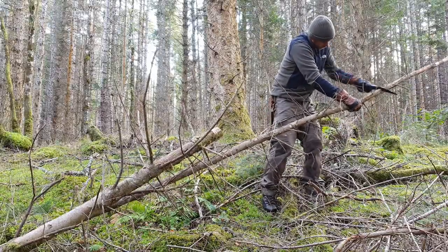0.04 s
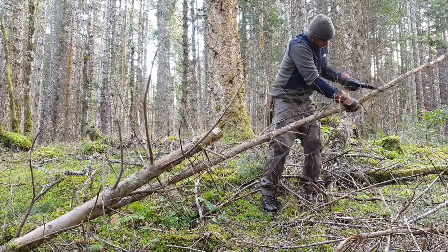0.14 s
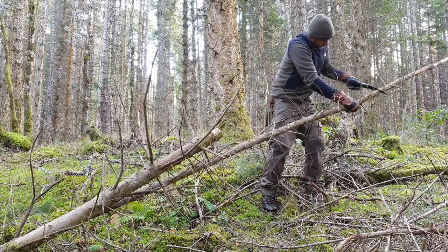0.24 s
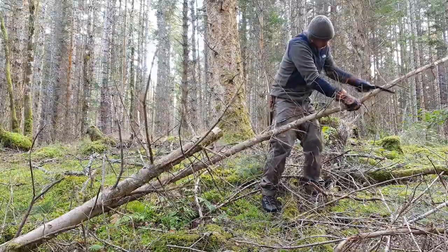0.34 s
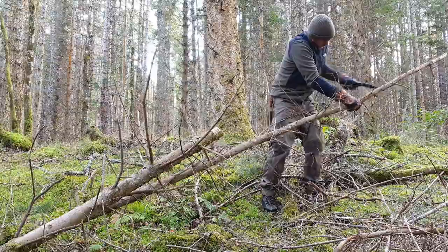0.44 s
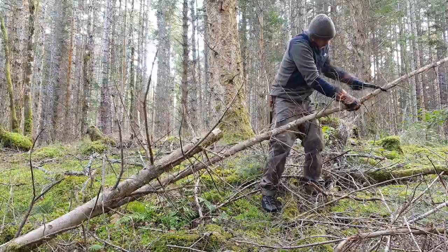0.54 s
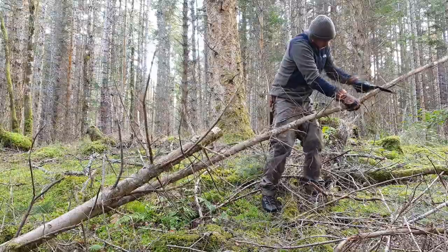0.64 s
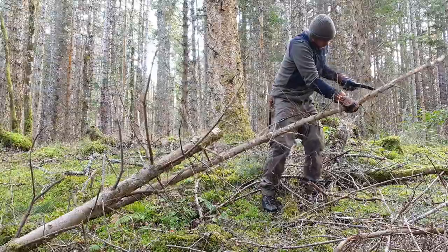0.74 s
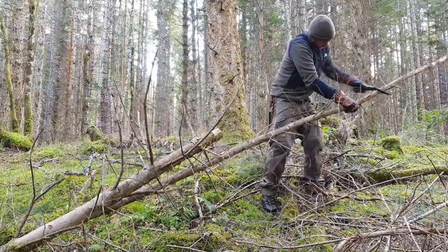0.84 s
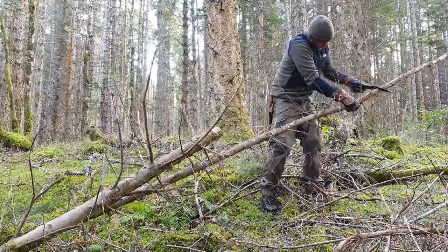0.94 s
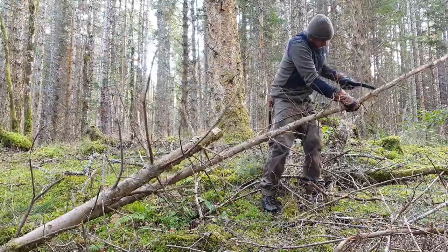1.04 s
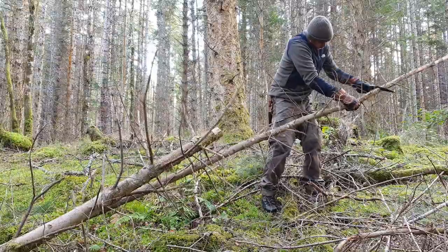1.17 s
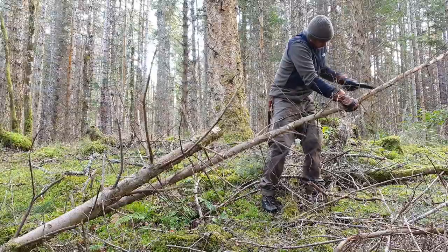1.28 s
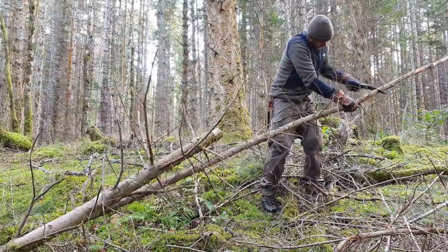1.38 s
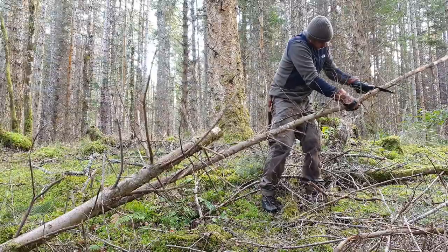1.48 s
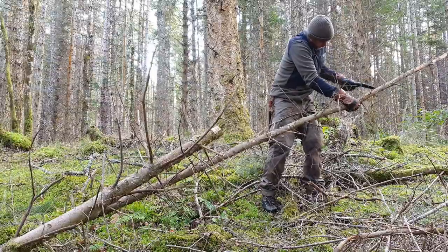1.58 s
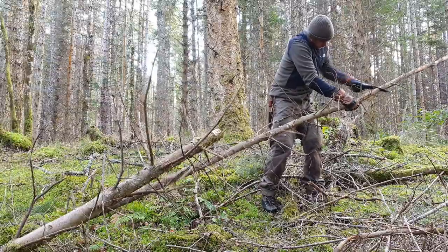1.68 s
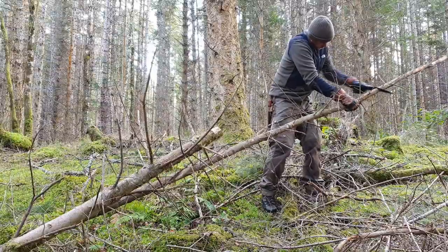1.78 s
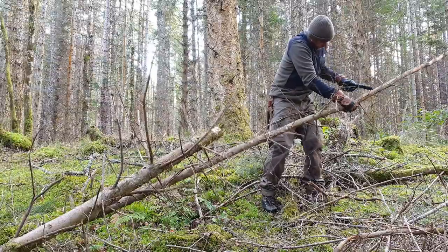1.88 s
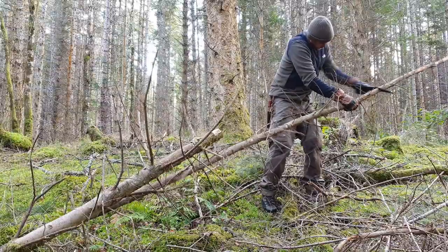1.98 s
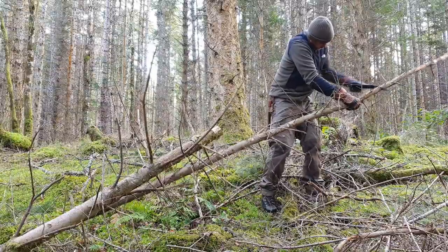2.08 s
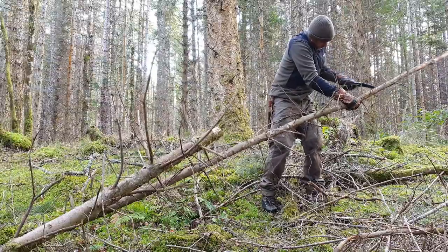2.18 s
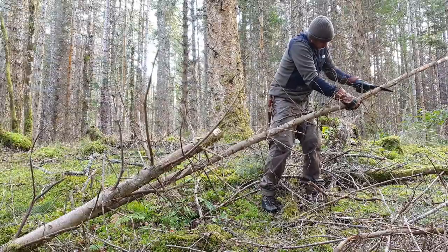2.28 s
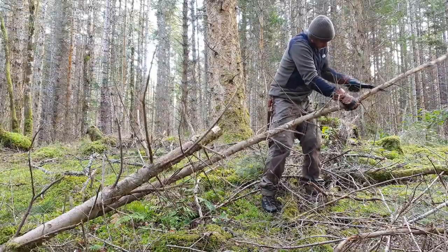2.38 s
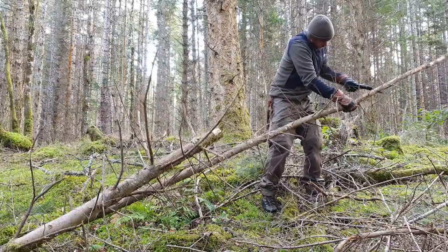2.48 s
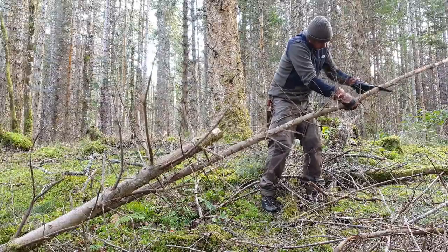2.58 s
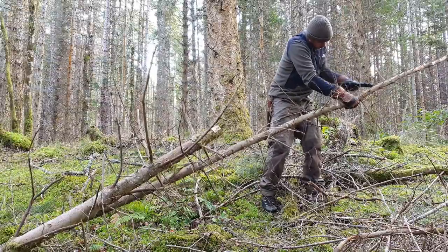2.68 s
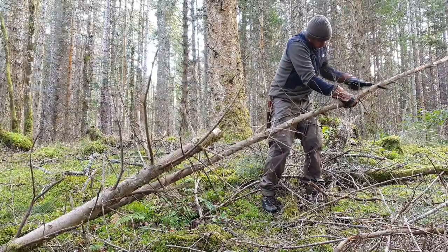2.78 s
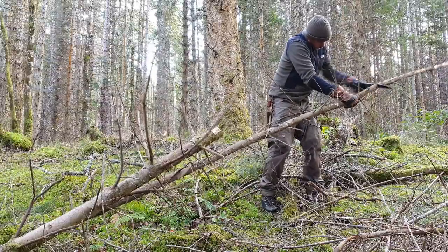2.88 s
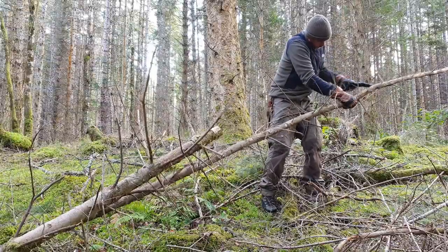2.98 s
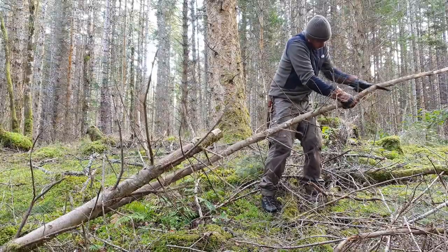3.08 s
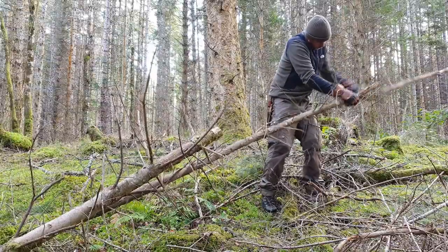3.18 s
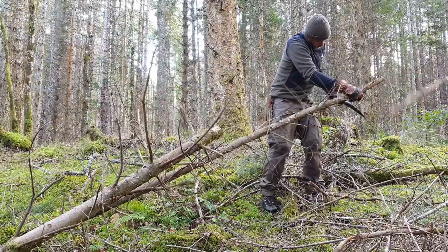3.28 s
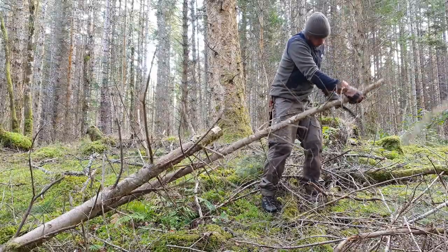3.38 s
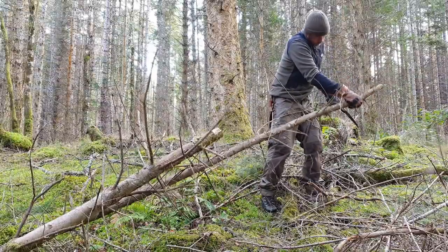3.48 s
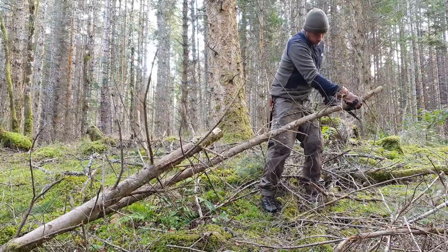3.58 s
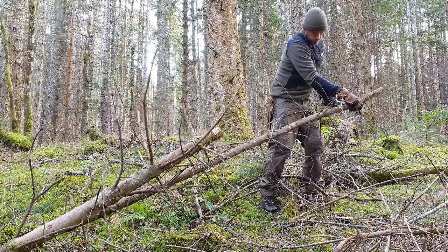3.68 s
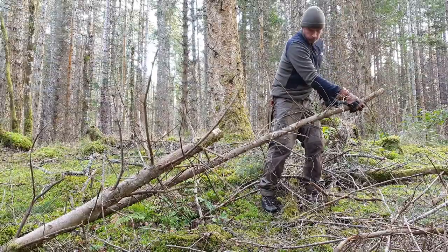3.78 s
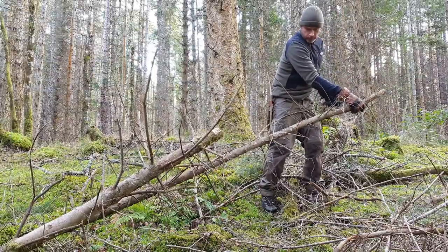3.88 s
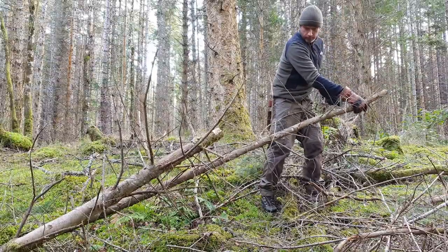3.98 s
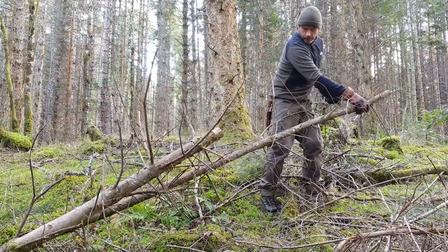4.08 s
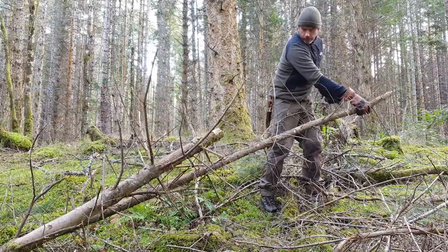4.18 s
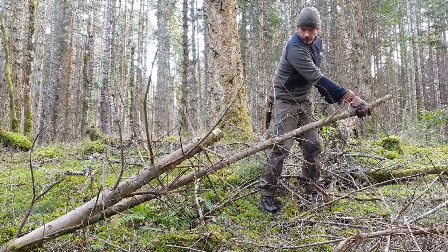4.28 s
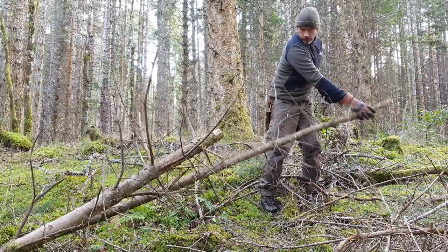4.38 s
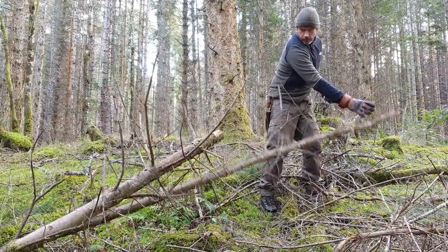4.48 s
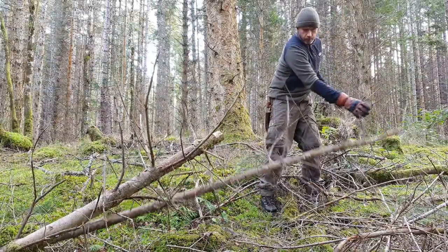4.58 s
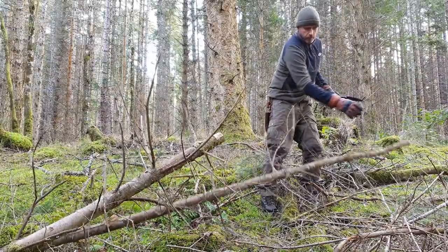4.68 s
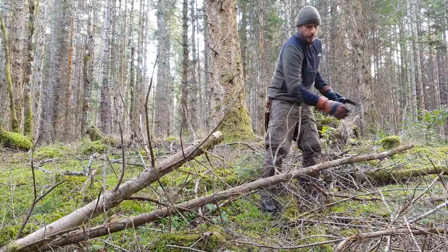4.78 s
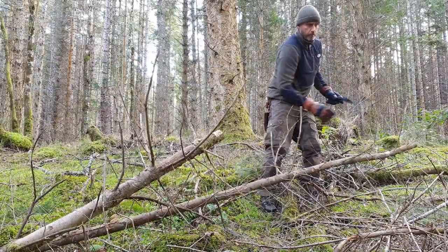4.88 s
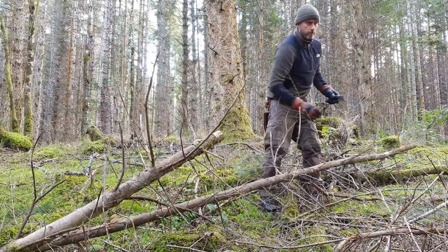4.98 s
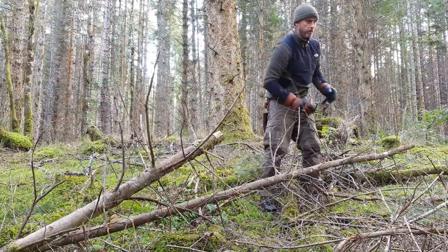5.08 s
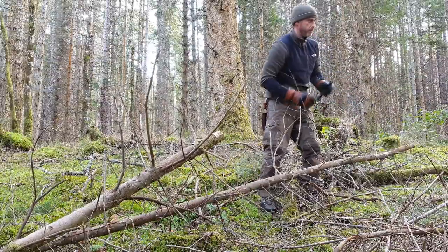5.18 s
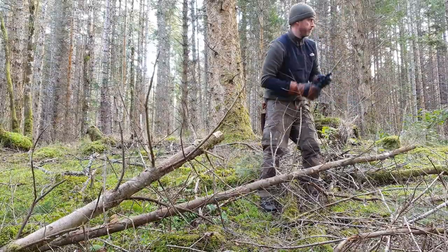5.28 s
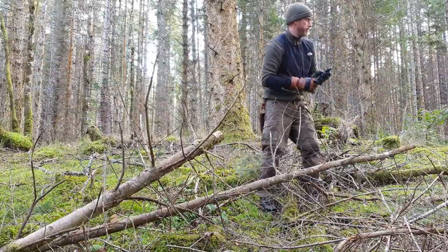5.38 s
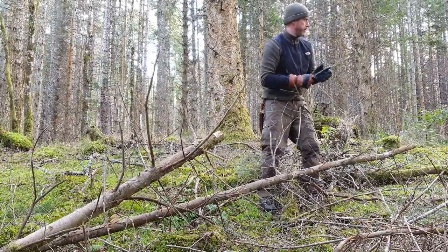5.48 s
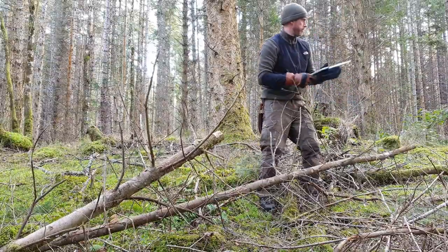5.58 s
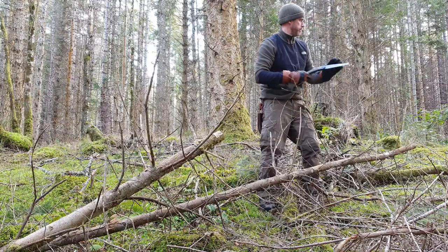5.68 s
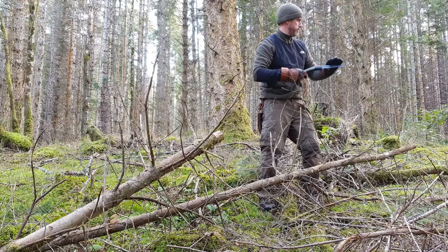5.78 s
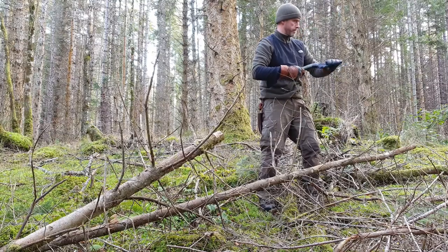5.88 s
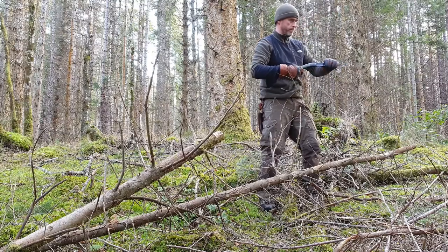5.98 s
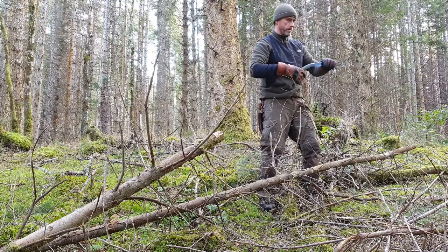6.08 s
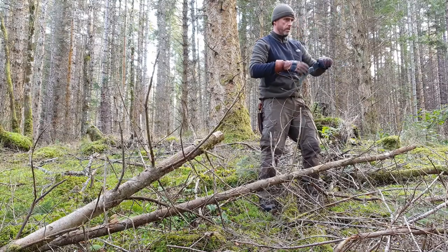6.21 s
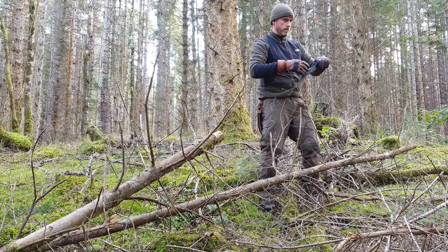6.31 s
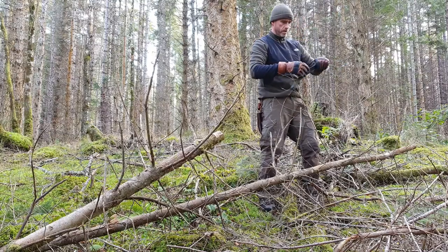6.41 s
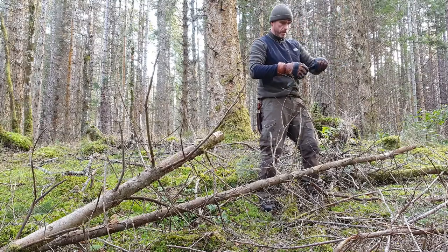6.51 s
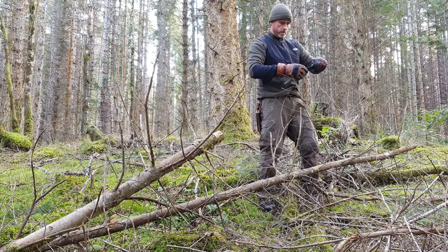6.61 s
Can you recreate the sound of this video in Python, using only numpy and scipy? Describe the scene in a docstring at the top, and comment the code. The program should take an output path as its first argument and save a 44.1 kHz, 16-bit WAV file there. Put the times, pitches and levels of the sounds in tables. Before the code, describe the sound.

Quick hand sawing, about seven strokes a second, coarse and woody with fizzing teeth, slightly left of centre in stereo. It stops just after three seconds following a loud dry snap. Small clicks and scraping twigs follow, then the remaining branch falls into brush with brittle cracks and muffled thumps. Afterwards only tiny rustles, faint treetop air and soft low wind bumps on the right, with a short woodland echo.

```python
"""In a conifer forest, a hand saw is pushed and pulled through a dead branch a few metres away.
Striking teeth and torn fibres make the rasp; a caught blade judders; breaks are short bursts ringing the wood.
Twigs scrape as clumps of grains, and the rest of the branch drops into dry brush with cracks and dull thuds.
Scattered noise taps give a short echo off brush and trunks; shaped noise gives faint treetop wind,
and low buffets almost all on the right."""
import sys
import numpy as np
from scipy import signal
from scipy.fft import rfft, irfft
from scipy.io import wavfile

SR = 44100
rng = np.random.default_rng(int(sys.argv[2]) if len(sys.argv) > 2 else 0)


def materialize(psi):
    """Save the field psi as 16-bit PCM at rate SR to the path in sys.argv[1].

    A 1-D psi becomes a single channel; in a 2-D psi each row is a channel.
    """
    bounded = np.clip(np.atleast_2d(psi).T, -1, 1)
    quanta = np.round(bounded * 32767).astype(np.int16)
    wavfile.write(sys.argv[1], SR, quanta)


N = 293253
TIME = np.arange(N) / SR


def amp(db):
    """Decibels to gain."""
    return 10 ** (np.asarray(db) / 20)


def unit(x):
    """Scales to an rms of 1."""
    return x / np.sqrt(np.mean(x ** 2) + 1e-20)


def read(points, hz):
    """Reads a table on a log-frequency axis."""
    f, value = np.transpose(points)
    return np.interp(np.log(hz + 1), np.log(f + 1), value)


def colour(x, points):
    """Minimum-phase filter with the given spectrum, so nothing sounds ahead of its cause."""
    level_db = read(points, abs(np.fft.fftfreq(4096, 1 / SR)))
    log_gain = np.log(amp(np.maximum(level_db, -90)))
    spectrum = np.exp(np.conj(signal.hilbert(log_gain)))
    taps = np.fft.ifft(spectrum).real[:2048]
    return signal.oaconvolve(x, taps)[:len(x)]


def ring(x, hz, width_hz):
    """One resonance, of gain 1 at its peak."""
    return signal.lfilter(*signal.iirpeak(hz, hz / width_hz, SR), x)


def wander(hz):
    """Smooth random motion of rms 1, mostly slower than the given rate."""
    slow = np.exp(-(np.fft.rfftfreq(N, 1 / SR) / hz) ** 2)
    return unit(irfft(rfft(rng.standard_normal(N)) * slow, N))


def grains(per_s, spread_db):
    """Random clicks of either sign, most of them small."""
    size = amp(spread_db * np.minimum(rng.exponential(1, N), 4.5))
    size = size * rng.choice([-1, 1], N)
    return unit(size * (rng.random(N) < per_s / SR))


def add(mix, start_s, sound):
    """Mixes a sound in at a time."""
    part = mix[..., max(round(start_s * SR), 0):][..., :sound.shape[-1]]
    part += sound[..., :part.shape[-1]]


def ports(x, left_over_right_db, left_lag=7):
    """Two microphones a little apart: a positive lag (samples) brings the sound to the left one later."""
    left = np.roll(x, round(left_lag)) * amp(left_over_right_db / 2)
    right = x * amp(-left_over_right_db / 2)
    return np.array([left, right])


# spectrum of the far wind: pitch_hz, relative_level_db
WIND_SPECTRUM = [(20, -11.5), (45, -2.5), (65, 5.5), (95, -7), (128, -4.5), (200, -12), (330, -10),
                 (450, -9), (750, -9.5), (1200, -15), (2000, -27), (4000, -41), (8000, -47.5),
                 (16000, -47.5)]
# likeness of the two channels in the wind: pitch_hz, likeness (0-1, no unit)
WIND_LIKENESS = [(40, 1), (130, 0.2), (290, 0.8), (640, 0.4), (1400, 0)]


def air(wind_db=-58, sway_db=1, hum_db=-55):
    """Far wind in the treetops as shaped noise; the long branch hums low while it is being sawn."""
    a, b = rfft(rng.standard_normal((2, N)))
    same = np.clip(read(WIND_LIKENESS, np.fft.rfftfreq(N, 1 / SR)), 0, 1)
    pair = irfft(np.array([a, same * a + np.sqrt(1 - same ** 2) * b]), N)
    wind = unit(np.array([colour(channel, WIND_SPECTRUM) for channel in pair]))
    wind = amp(wind_db + sway_db * wander(2)) * wind
    hum = unit(ring(ring(rng.standard_normal(N), 61, 33), 61, 33))
    hum = hum * np.interp(TIME, [2.2, 3.4], [1, 0])  # fades out as the sawing ends
    return wind + amp(hum_db) * hum


# strokes of the arm, pushing first, then pulling and pushing by turns: start_s, effort_db
STROKES = [(-0.03, -41), (0.104, -40.5), (0.257, -44.5), (0.382, -38), (0.53, -40), (0.676, -38.5),
           (0.812, -41), (0.947, -37), (1.093, -40), (1.242, -39), (1.372, -39), (1.504, -37.5),
           (1.652, -38), (1.79, -39), (1.932, -40.5), (2.064, -36.5), (2.215, -41.5), (2.366, -43.5),
           (2.497, -43), (2.612, -36), (2.763, -41.5), (2.886, -38), (3.038, -43)]
SAWING_ENDS_S = 3.18


def arm(bite_power=0.84, slide_db=-16, hiss_db=-48.77, hiss_follows=0.85, usual_effort_db=-38.5,
        hiss_sag_db=-1.5):
    """Each stroke waits at the turn, speeds up and stops; the rasp follows blade speed and effort."""
    start_s, effort_db = np.transpose(STROKES)
    length_s = np.diff(start_s, append=SAWING_ENDS_S)
    k = np.clip(np.searchsorted(start_s, TIME) - 1, 0, len(start_s) - 1)
    pull = k % 2
    # for (push, pull): still shares of the stroke before and after the move
    wait, rest = np.array([.06, .075])[pull], np.array([.08, .07])[pull]
    # a negative lean makes the bite harder early in the stroke
    lean = np.array([-0.84, -0.36])[pull]
    travel = np.clip(((TIME - start_s[k]) / length_s[k] - wait) / (1 - wait - rest), 0, 1)
    speed = abs(np.sin(np.pi * travel))
    rasp = amp(effort_db[k]) * np.exp(lean * (travel - .5)) * speed ** bite_power
    # the blade still rubs in the cut as it turns round
    slide = amp(slide_db) * (TIME < SAWING_ENDS_S)
    # the hiss follows the effort only in part
    hiss = amp(hiss_db + hiss_follows * (effort_db[k] - usual_effort_db)) * np.hypot(speed, slide)
    hiss = hiss * amp(hiss_sag_db * (travel - .5))  # sawdust fills the teeth along the stroke
    return speed, travel, pull == 1, rasp, hiss


# spectrum of the wood on a pull: pitch_hz, relative_level_db
PULL_SPECTRUM = [(170, -22), (290, -3), (390, -1.5), (500, -15), (680, -4), (1000, -5.5), (1200, 0.5),
                 (1400, -7), (1750, -2), (2400, -10), (3000, -12), (3600, -14.5), (4600, -24.5),
                 (7000, -55.5)]
# spectrum of the wood on a push: pitch_hz, relative_level_db
PUSH_SPECTRUM = [(190, -16), (300, -6), (400, -2.5), (510, -9), (760, -2.5), (1000, -4), (1400, -7),
                 (1800, -4), (2050, -3.5), (2300, -7.5), (3000, -12), (3500, -12.5), (4600, -25),
                 (7000, -54)]
# spectrum of the hissing teeth: pitch_hz, relative_level_db
TEETH_SPECTRUM = [(2500, -20.5), (4000, 1.5), (4700, -7.5), (6400, -6), (7200, -15), (8000, -14),
                  (8900, -5), (11000, -11.5), (12400, -8), (16000, -15)]
# modes of the branch: pitch_hz, width_hz
BRANCH_MODES = [(400, 170), (810, 190), (1140, 180), (1770, 72), (3500, 400)]


def saw(tooth_hz=520, jitter=.1, tooth_db=-1, fibre_db=-5, pull_db=-1.5, push_db=-3.0, blade_db=-2,
        flutter_db=2.0, mode_swing_db=2.5, deepening_db=7):
    """Teeth strike the cut at a rate set by blade speed, and each tears a cluster of fibres."""
    speed, travel, pulling, rasp, hiss = arm()
    # tooth_hz is the middle strike rate at full speed
    turns = np.cumsum(tooth_hz * speed ** .7 * np.exp(jitter * wander(200))) / SR
    strikes = np.diff(np.floor(turns), prepend=0) * amp(2.34 * wander(650)) * np.sqrt(SR / tooth_hz)
    tearing = unit(.5 + np.exp(-(turns % 1) / 0.48))
    fibres = tearing * grains(5000, 3.1)
    grip = amp(flutter_db * wander(140))
    drive = grip * (amp(tooth_db) * strikes + amp(fibre_db) * fibres)

    # both colours are scaled to equal energy
    impulse = signal.unit_impulse(4096)
    pull, push = (colour(drive, spectrum) / np.linalg.norm(colour(impulse, spectrum))
                  for spectrum in (PULL_SPECTRUM, PUSH_SPECTRUM))
    push = push + amp(blade_db) * speed ** 2 * ring(push, 2050, 70)  # the blade sings when pushed
    wood = rasp * np.where(pulling, amp(pull_db) * pull, amp(push_db) * push)
    # the contact point shifts, driving each mode now more and now less
    for hz, width_hz in BRANCH_MODES:
        wood = wood + (amp(mode_swing_db * wander(14)) - 1) * ring(wood, hz, width_hz)
    # the teeth sink in along the stroke, so the rasp grows deeper
    deep = signal.sosfiltfilt(signal.butter(2, 1300, fs=SR, output="sos"), wood)
    sinking = amp(deepening_db * (travel - .5))
    wood = deep * sinking + (wood - deep) / np.sqrt(sinking)

    teeth = hiss * unit(colour(grip * tearing * grains(7000, 2.5), TEETH_SPECTRUM))
    return ports(wood, 2.5) + ports(teeth, 0.37)


# gusts at the right microphone, levels before the trim: start_s, length_s, level_db
BUFFETS = [(0.005, 0.12, -26.5), (0.115, 0.14, -40), (0.233, 0.053, -33), (0.381, 0.18, -38),
           (0.593, 0.087, -32.5), (0.743, .16, -32), (1.077, 0.15, -32.5), (1.343, .05, -31),
           (1.527, 0.091, -31.5), (1.633, .15, -26), (2.026, 0.17, -35), (2.547, 0.16, -33.5),
           (3.079, 0.07, -41.5), (4.3, 0.064, -36.5), (4.585, 0.087, -43.5), (4.74, 0.22, -46.5),
           (5.279, 0.062, -35.5), (5.482, 0.099, -51.5)]


def buffets(trim_db=-2.5, left_db=-24, lump_db=3.5, rise_s=.01, fall_s=0.023, sag_db=-6.5):
    """Each gust arrives quickly and sags away in lumps of low pressure, almost all on the right."""
    spectrum = [(15, -30), (40, -11), (63, 0), (100, -5), (150, -18), (300, -32), (800, -55), (2000, -85)]
    rumble = colour(rng.standard_normal(N), spectrum) * amp(lump_db * wander(25))
    out = np.zeros(N)
    for start_s, length_s, level_db in BUFFETS:
        at = (TIME > start_s) & (TIME < start_s + length_s)
        age = TIME[at] - start_s
        rise = np.minimum(age / rise_s, 1)
        fall = np.minimum((length_s - age) / fall_s, 1)
        gust = rise * fall * amp(sag_db * age / length_s)
        out[at] += amp(level_db + trim_db) * unit(rumble[at] * gust)
    return out * amp([[left_db], [0]])


# the teeth catch and the branch judders, levels before the trim:
# middle_s, level_db, half_length_s, middle_pitch_hz
CATCHES = [(0.862, -42.5, 0.03, 419.3), (1.326, -41, 0.05, 398), (1.599, -38.5, 0.03, 390.6),
           (1.691, -39, 0.03, 401.3), (1.893, -38, 0.038, 577.7), (2.038, -40, 0.017, 398),
           (2.154, -34.5, 0.04, 396.8), (2.276, -38.5, 0.039, 397.3), (2.462, -41.5, 0.023, 397),
           (2.592, -37.5, 0.01, 391.8)]


def judder(trim_db=-0.5, sag=0.172, knock_db=0.52):
    """A caught blade hops from tooth to tooth and shakes the branch, slowing as it goes."""
    out = np.zeros(N)
    unsteady, uneven = wander(375), wander(269.8)
    for middle_s, level_db, half_length_s, hz in CATCHES:
        at = abs(TIME - middle_s) < half_length_s
        u = (TIME[at] - middle_s) / half_length_s  # -1 to 1 through the catch
        turns = np.cumsum(hz * (1 - sag * u + 0.13 * unsteady[at])) / SR
        knocks = sum(np.cos(2 * np.pi * k * turns + k * k) / k for k in range(2, 5))
        knocks = knocks * amp(3.2 * uneven[at])
        shake = unit(np.sin(2 * np.pi * turns) + amp(knock_db) * knocks)
        out[at] += amp(level_db + trim_db) * shake * np.cos(np.pi * u / 2) ** 4
    return ports(out, 2.2)


# dry wood breaks, splinters before their trim: time_s, body_db, ring_hz, splinter_db
SNAPS = [(1.784, -38, 2600, -48), (2.641, -34.5, 1900, -48), (2.815, -33.5, 1750, -44),
         (2.919, -20, 1700, -33), (3.57, -45, 4000, -41.5), (3.689, -36.5, 3500, -35),
         (3.6994, -33, 3500, -36), (3.879, -60.5, 3600, -55), (3.963, -53, 3500, -54),
         (4.492, -51.5, 3000, -60), (4.553, -28, 4000, -35), (4.616, -40.5, 2600, -34.5),
         (4.712, -48.5, 2200, -53), (4.752, -23, 3000, -21)]
# where it breaks (in the cut, at the twig further right, then on the ground ahead):
# from_s, left_lag_samples
SNAP_PLACES = [(0, 5), (3.3, 11), (4.4, -3)]
# spectrum of a break in a stick, around its ring: pitch_hz, relative_level_db
STICK_SPECTRUM = [(150, -21.5), (500, -15), (750, -6), (1200, -7), (1800, 0.5), (2500, -6), (3400, -0.5),
                  (4800, -4.5), (6200, 0), (7600, -14.5), (16000, -39)]
# spectrum of the bright splinters: pitch_hz, relative_level_db
SPLINTER_SPECTRUM = [(3000, -30), (6200, -7.5), (7600, -6), (9400, 7), (11500, -1.5), (13500, 3),
                     (15500, -2)]


def snaps(ring_db=5, ring_width_hz=800, dull_above=1.8, dull_db=-10, splinter_trim_db=-1,
          tear_s=0.0013, after_db=-17, after_s=.004, lead_s=.0005):
    """A break is a short burst of tearing fibres: it rings the stick briefly and sprays bright splinters."""
    out, t = np.zeros((2, N)), TIME[:4096]
    window = np.sqrt(.005 * SR / len(t))  # levels count as if the energy filled 5 ms
    for time_s, body_db, hz, bright_db in SNAPS:
        lag = [lag for from_s, lag in SNAP_PLACES if from_s <= time_s][-1]
        decay = np.exp(-t / tear_s) + amp(after_db) * np.exp(-t / after_s)
        burst = rfft(rng.standard_normal(len(t)) * decay)
        # the tear is so short that its energy lies almost evenly over all pitches
        tear = np.roll(irfft(burst / abs(burst) ** .8), 64) * (t < .04)
        # thick wood rings lower and sounds duller
        dulling = [(hz * dull_above, 0), (2 * hz * dull_above, dull_db)]
        body = colour(colour(tear, STICK_SPECTRUM), dulling)
        body = body + amp(ring_db) * ring(body, hz, ring_width_hz)
        splinters = unit(colour(tear, SPLINTER_SPECTRUM))
        crack = amp(body_db) * unit(body) + amp(bright_db + splinter_trim_db) * splinters
        add(out, time_s - lead_s, ports(window * crack, 4.2, lag)[:, 56:-64])
    return out


# twigs, needles and sleeves brush past each other, levels before the trim:
# loudest_s, level_db, swell_s, fade_s, treble_db
BRUSH = [(3.17, -55.5, .06, .2, -1), (3.619, -51.5, 0.095, .025, 3.5), (3.75, -57.5, 0.022, 0.029, 9),
         (3.985, -61.5, 0.019, .11, 3), (4.383, -65, 0.033, .025, -15), (4.525, -58.5, .03, .02, -2),
         (4.665, -47, .085, .03, -1), (4.86, -58, .03, .035, -6), (4.975, -54, 0.011, .016, -13.5),
         (5.09, -55, 0.037, 0.017, -7.5), (6.07, -78, 0.028, 0.032, -1), (6.31, -72, 0.04, .04, -3),
         (6.48, -68, 0.019, 0.022, -0.5)]
# spectrum of the scraping twigs: pitch_hz, relative_level_db
TWIG_SPECTRUM = [(150, -18.5), (350, -6), (700, -4), (1300, -2), (2000, -2), (2700, -3), (3600, -2),
                 (5000, -10.5), (6400, -10.5), (7600, -18.5), (9400, -10), (11500, -15.5), (16000, -16)]


def brush(trim_db=-2, clump_db=3, tick_db=-4, treble_hz=4200):
    """Dry twigs scrape in little clumps and tick as the wood slides by; each rustle swells and fades."""
    scraping = grains(7000, 3) + amp(tick_db) * grains(250, 3.1)
    rustle = unit(colour(scraping, TWIG_SPECTRUM)) * amp(trim_db + clump_db * wander(50))
    treble = signal.sosfiltfilt(signal.butter(2, treble_hz, "high", fs=SR, output="sos"), rustle)
    out = np.zeros(N)
    for loudest_s, level_db, swell_s, fade_s, treble_db in BRUSH:
        away = np.maximum((loudest_s - TIME) / swell_s, (TIME - loudest_s) / fade_s)
        out += amp(level_db) * np.exp(-away) * (rustle + (amp(treble_db) - 1) * treble)
    return ports(out, 1.5)


# soft thuds on moss and brush: start_s, level_db, decay_s
THUDS = [(3.2, -56, .15), (3.6, -53.5, .06), (3.7, -47, .035), (3.96, -52, .12), (4.49, -55.5, 0.077),
         (4.56, -51.5, .14), (4.76, -52.5, .1)]


def thuds(rise_s=0.0031):
    """Wood and boots settle on the soft ground: dull pushes without any ring."""
    ground = [(25, -8.5), (60, 8), (120, -10), (200, -13), (400, -9.5), (800, -13.0),
              (1500, -19.5), (4000, -44.5)]
    push = np.zeros(N)
    for start_s, level_db, decay_s in THUDS:
        age = np.maximum(TIME - start_s, 0)
        push += amp(level_db) * np.exp(-age / decay_s) * (1 - np.exp(-age / rise_s))
    return ports(push * unit(colour(rng.standard_normal(N), ground)), 0)


# forest echo, time to fall by 60 dB: pitch_hz, t60_s
FOREST_DECAY = [(300, 0.83), (1000, 0.4), (3000, 0.56), (8000, 0.4), (16000, 0.23)]


def echo(near_db, near_s, far_db):
    """Brush scatters the treble at once; the trunks answer with a thin longer tail."""
    t = TIME[:SR]
    near = rng.standard_normal((2, SR)) * np.exp(-t / near_s) * (t > .001)
    near = signal.sosfilt(signal.butter(2, 650, "high", fs=SR, output="sos"), near)
    trunks = rng.standard_normal((2, SR)) * (rng.random((2, SR)) < .08) * (1 - np.exp(-t / 0.0093))
    # each pitch dies away at its own pace
    hz, age, bands = signal.stft(trunks, SR, nperseg=256)
    fading = amp(-60 * age / read(FOREST_DECAY, hz)[:, None])
    far = signal.istft(bands * fading, SR, nperseg=256)[1][:, :SR]
    return (amp(near_db) * unit(near) + amp(far_db) * unit(far)) / np.sqrt(SR)


def forest(x, near_db, near_s, far_db, count=5, moves_per_s=23):
    """The source keeps moving, so it passes from one set of echo paths to the next."""
    place = (TIME * moves_per_s) % count
    out = x
    for k in range(count):
        away = abs((place - k + count / 2) % count - count / 2)
        share = np.cos(np.pi / 2 * np.minimum(away, 1))
        out = out + signal.oaconvolve(x * share, echo(near_db, near_s, far_db), axes=1)[:, :N]
    return out


# how the two microphone ports differ in tone: pitch_hz, left_minus_right_db
PORT_TONE = [(300, -0.5), (1200, 1), (3000, -0.5), (5800, 6), (9500, -5.5), (14000, 0)]


def port_tone(x):
    """Each microphone port colours the sound in its own way, most of all in the treble."""
    tilt_db = read(PORT_TONE, np.fft.rfftfreq(N, 1 / SR))
    return irfft(rfft(x) * amp([tilt_db / 2, -tilt_db / 2]), N)


def scene():
    """The saw, the breaking wood and the forest around them."""
    sawing = forest(saw() + judder(), near_db=-1.0, near_s=0.0065, far_db=-11.5)
    breaking = forest(snaps(), near_db=-6.5, near_s=0.018, far_db=-16.0)
    settling = forest(brush() + thuds(), near_db=1.0, near_s=.004, far_db=-7)
    return port_tone(sawing + breaking + settling) + buffets() + air()


def record(dry, edge_hz=16200):
    """A steep low-pass limits the band of both channels."""
    taps = signal.firwin(301, edge_hz, window=("kaiser", 9), fs=SR)
    return signal.oaconvolve(dry, taps[None], "same")


dry = scene()
out = record(dry)
materialize(out)
```